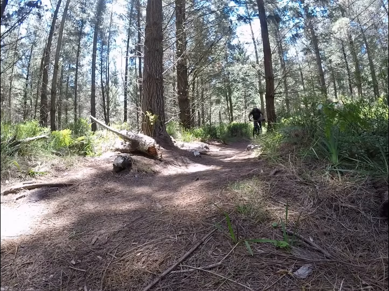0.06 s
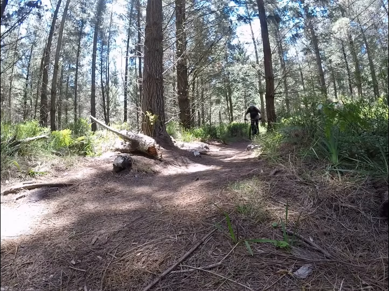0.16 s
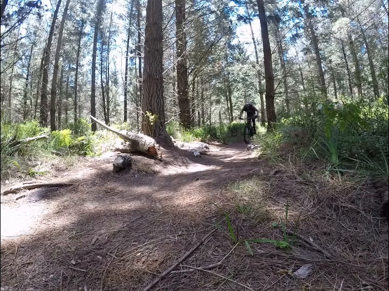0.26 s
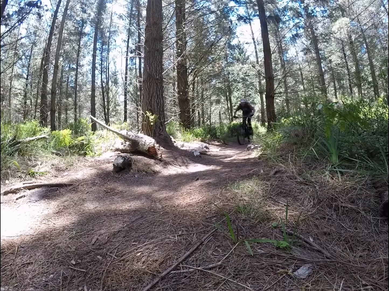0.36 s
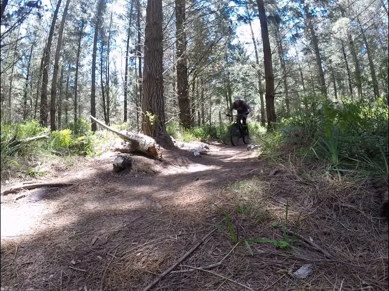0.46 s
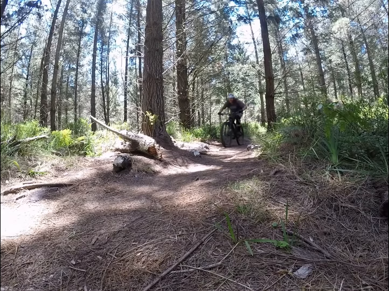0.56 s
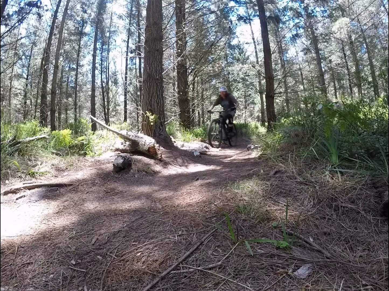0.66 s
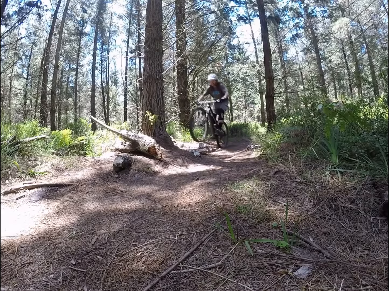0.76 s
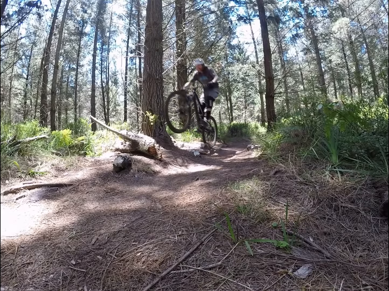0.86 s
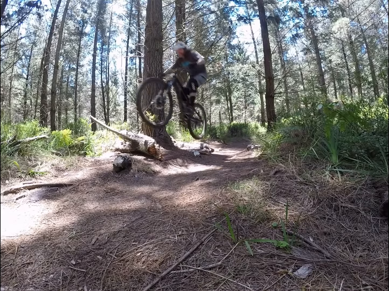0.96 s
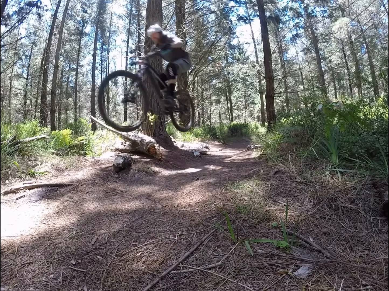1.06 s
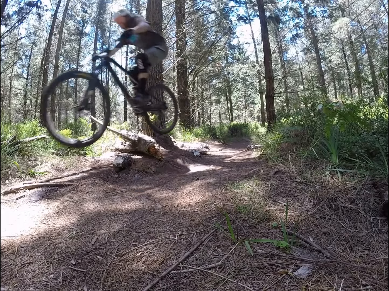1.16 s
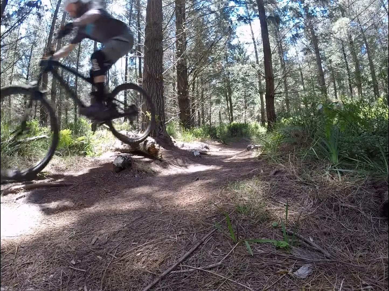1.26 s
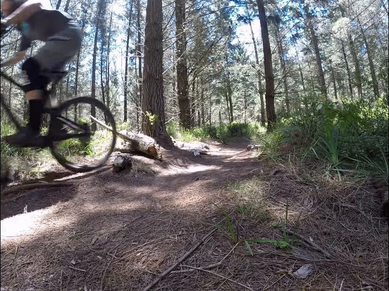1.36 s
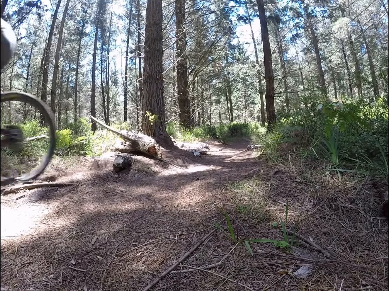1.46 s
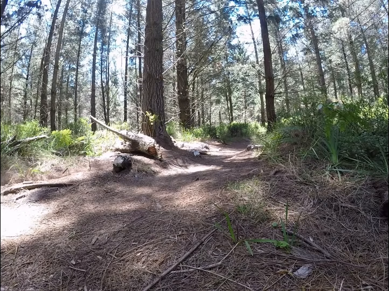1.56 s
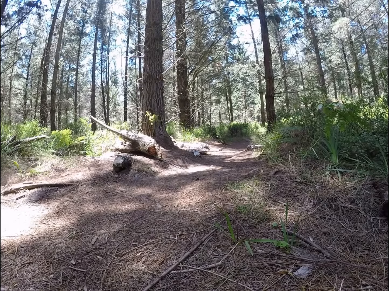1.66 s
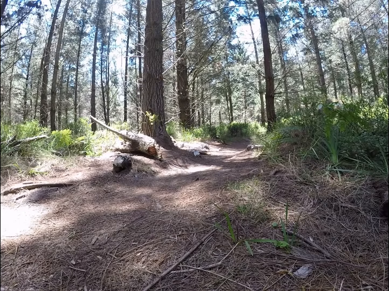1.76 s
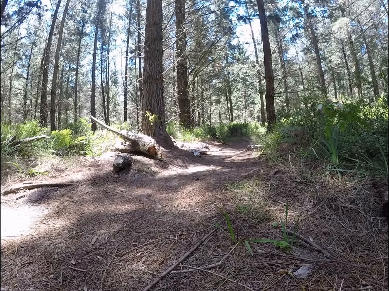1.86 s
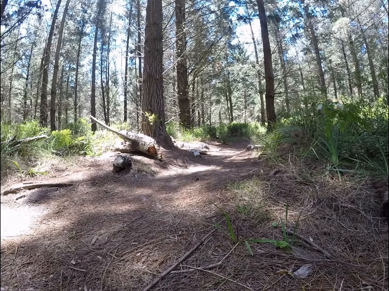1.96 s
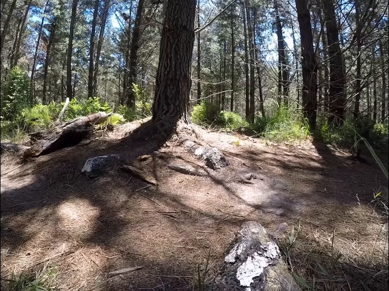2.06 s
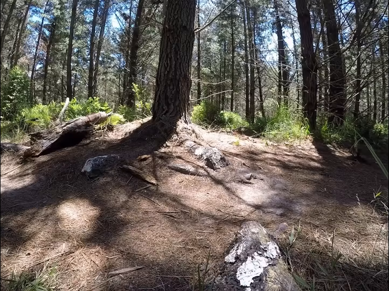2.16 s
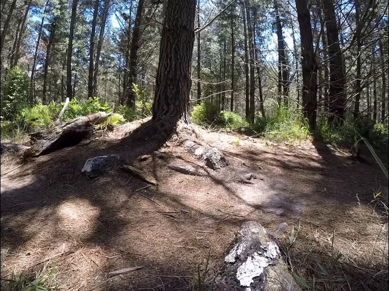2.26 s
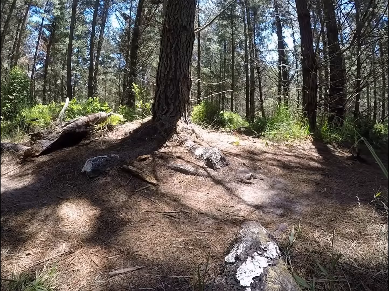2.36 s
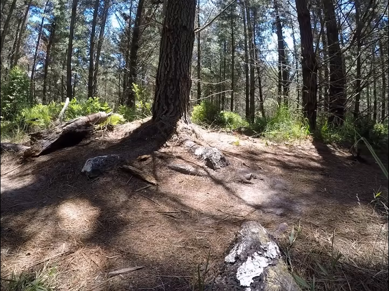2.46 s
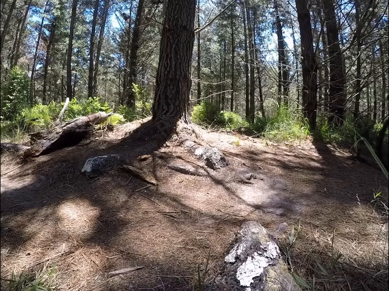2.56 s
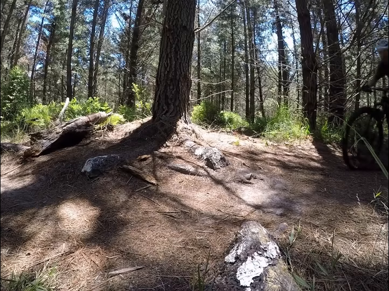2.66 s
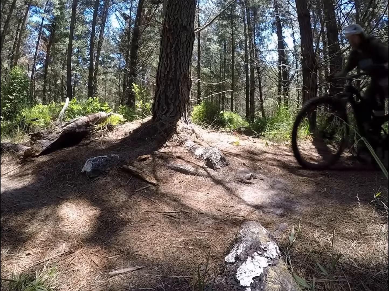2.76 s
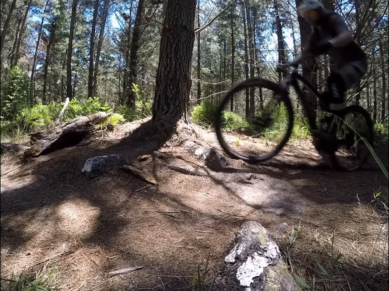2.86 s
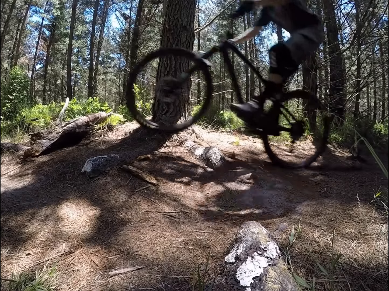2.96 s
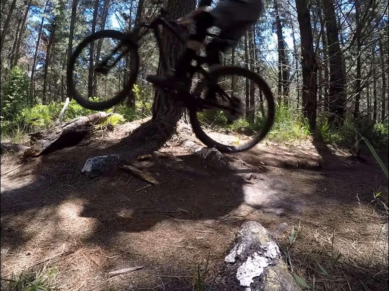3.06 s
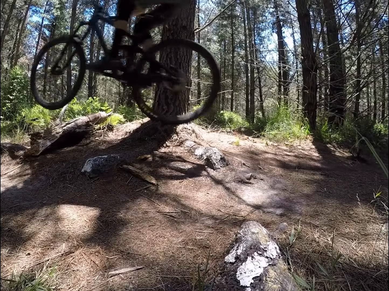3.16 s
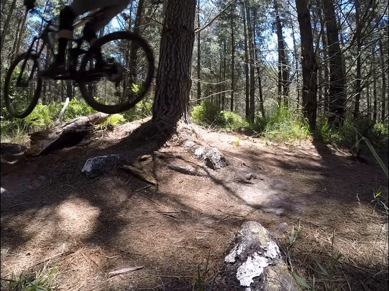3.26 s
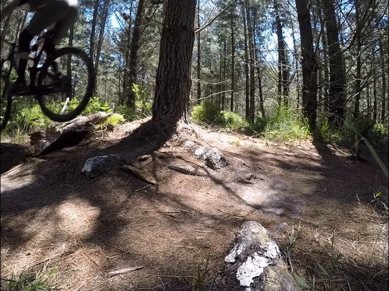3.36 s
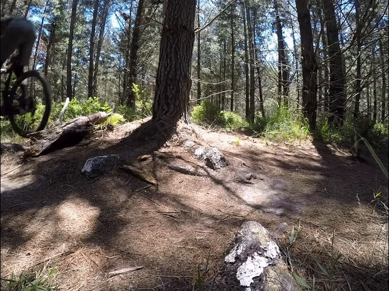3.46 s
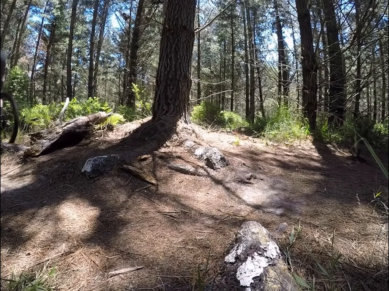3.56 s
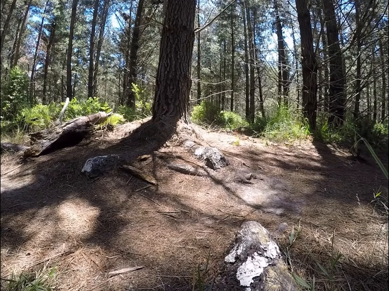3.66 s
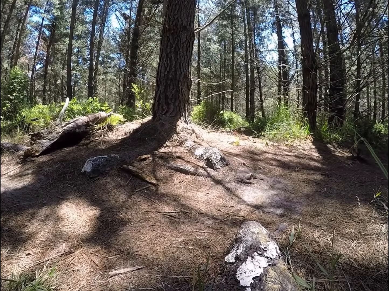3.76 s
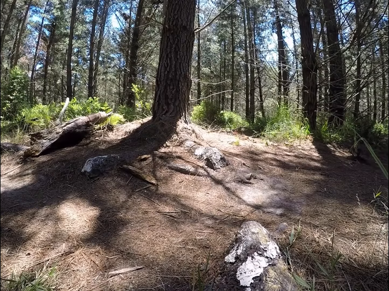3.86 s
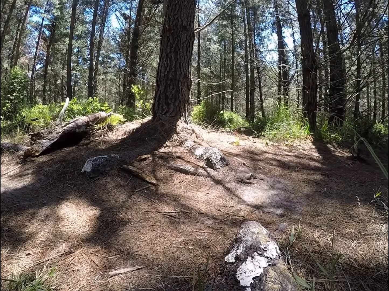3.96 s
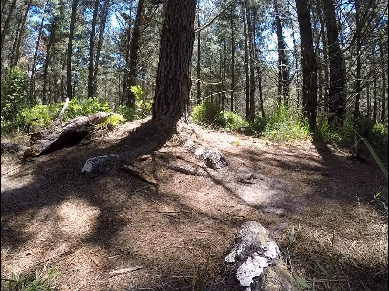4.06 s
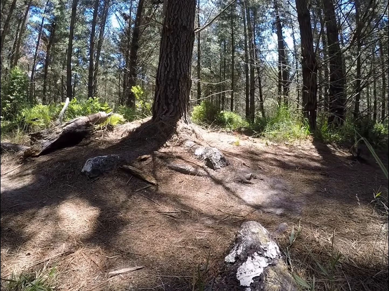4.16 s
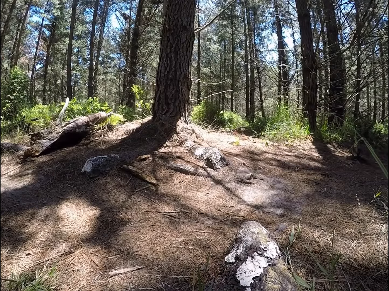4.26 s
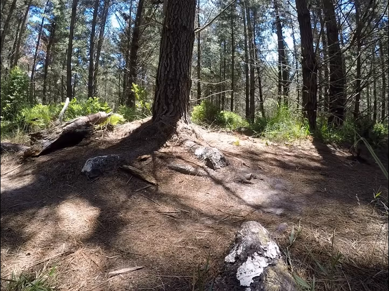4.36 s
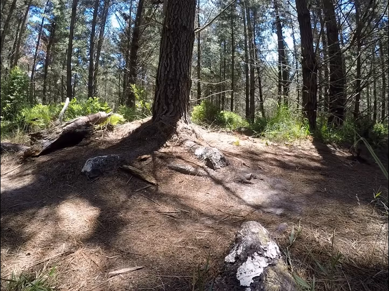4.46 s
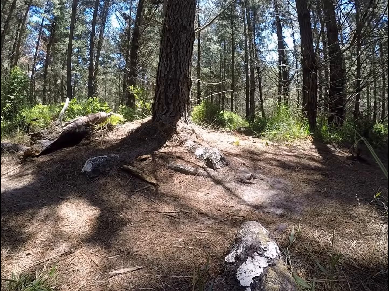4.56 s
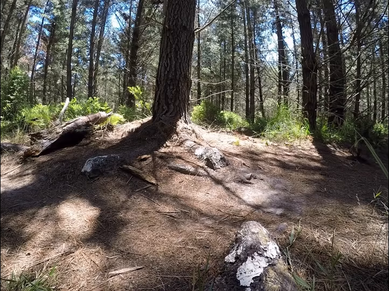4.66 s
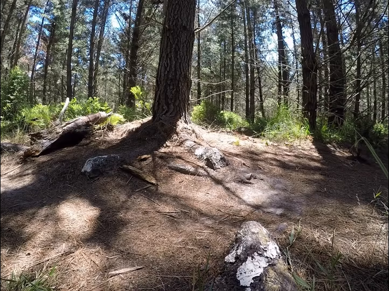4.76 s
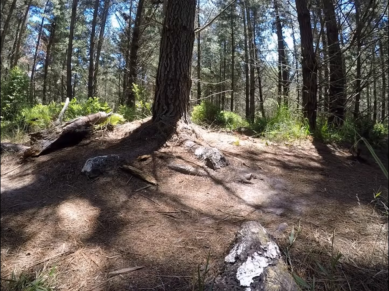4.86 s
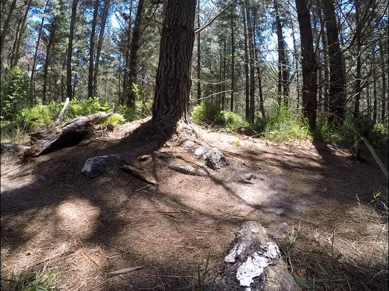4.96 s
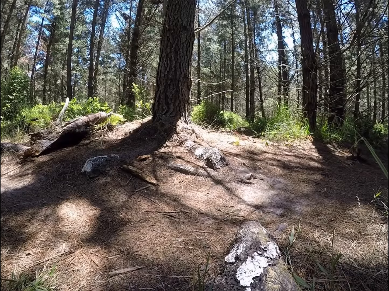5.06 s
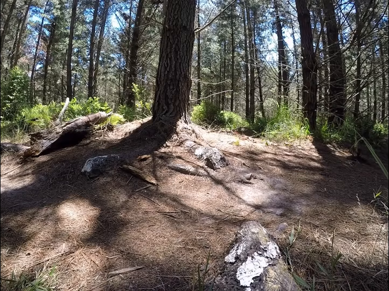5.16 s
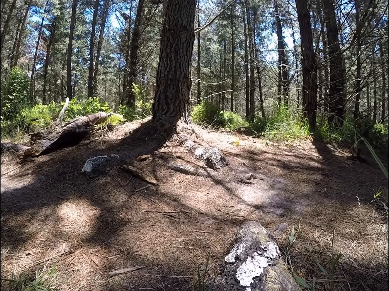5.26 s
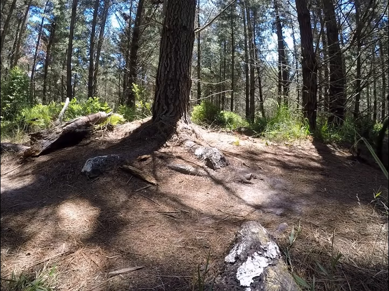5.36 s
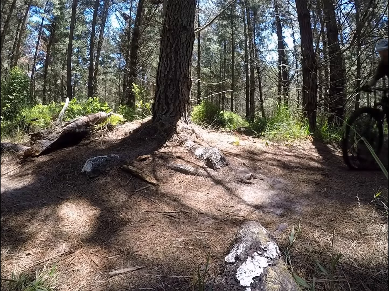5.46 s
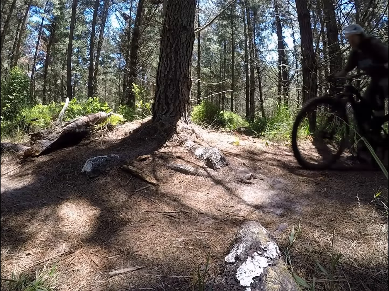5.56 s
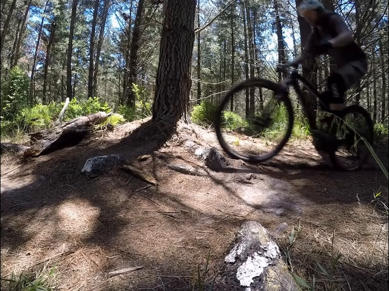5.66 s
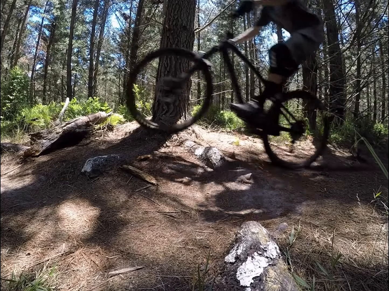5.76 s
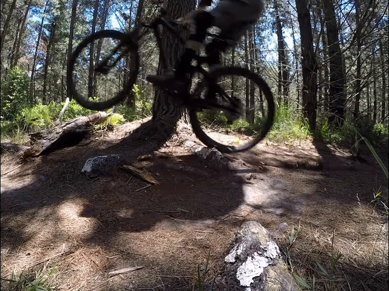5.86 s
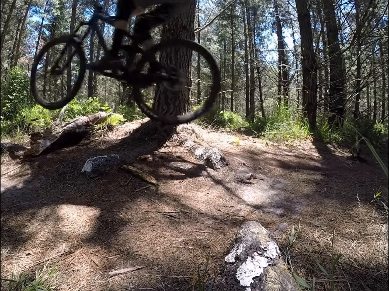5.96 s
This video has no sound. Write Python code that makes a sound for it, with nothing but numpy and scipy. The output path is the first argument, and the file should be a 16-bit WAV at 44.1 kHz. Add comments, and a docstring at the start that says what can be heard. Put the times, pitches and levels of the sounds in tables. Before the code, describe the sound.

A mountain bike buzzes up a dirt forest trail, thumps over a log with chain clatter, and rolls away; a second pass follows and partly repeats.

```python
"""On a forest trail a mountain bike jumps a log, twice, close to a listener near the ground; then part of the second pass repeats.
Shaped noise makes the air in the pines, the deep wake and the crunch; gliding tones make a faint bird.
The tyres drum, and each wheel strike is a set of fading tones with a burst of scuffed soil.
Chain clatter is a shower of tiny clicks ringing the frame; the freehub buzzes as a train of ticks ringing its shell."""
import sys
import numpy as np
from scipy import signal
from scipy.fft import rfft, irfft
from scipy.io import wavfile
from scipy.ndimage import map_coordinates

SR = 44100
rng = np.random.default_rng(int(sys.argv[2]) if len(sys.argv) > 2 else 0)


def bounce(signal):
    """Save signal as a 16-bit WAV file at the path given by the first command-line argument."""
    frames = np.transpose(np.atleast_2d(signal))
    limited = np.clip(frames, -1, 1)
    pcm = np.round(limited * 32767).astype(np.int16)
    wavfile.write(sys.argv[1], SR, pcm)


N = 265261
T = np.arange(N) / SR  # time of every sample, in seconds
FREQS = np.maximum(np.arange(N // 2 + 1) * SR / N, 1)  # in Hz, kept above zero for the logarithm
SECOND_PASS_S, REPEAT_AT_S = 2.1072, 4.91  # the second pass begins; it is heard again

# Tone of tyres drumming on the first trail. Each row: frequency in Hz, relative level in dB per Hz.
FIRST_TRAIL = [(90, -41), (120, -17.5), (150, 1.5), (230, 1.5), (310, -7), (420, -8.5), (600, -13.5),
               (850, -22), (1300, -43.5), (2500, -33.5)]
# A wheel strikes ground or root. Each row: time in seconds, relative thump level in dB, pitch factor,
# length factor, relative scuff level in dB.
WHEEL_STRIKES = [(0.647, -39.5, 1.23, 3.1, -52), (0.717, -24.5, 0.91, 1.7, -60),
                 (0.749, -33.5, 0.79, 0.79, -40), (0.875, -37.5, 1.05, 3.6, -52),
                 (1.2704, -22.5, 1.17, 0.75, -41), (1.339, -18, 0.92, 1.5, -33.5),
                 (1.383, -18, 1.22, 0.46, -37), (1.421, -25.5, 0.98, 0.63, -47),
                 (1.561, -21.5, 1.04, 1, -59), (2.764, -39.5, 1.05, 1.8, -40.5),
                 (2.854, -30, 1.1, 0.4, -42), (2.868, -17, 0.99, 0.61, -38.5),
                 (2.915, -25.5, 1.06, 1.14, -38.5), (3.039, -22, 0.96, 1.2, -50.5),
                 (3.073, -36, 0.97, 1.02, -37), (3.457, -21.5, 0.84, 0.68, -40),
                 (3.501, -20.5, 1.07, 1.1, -41.5), (3.597, -24.5, 0.99, 1.2, -69)]


def from_db(db):
    """Turn decibels into a gain."""
    return 10 ** (np.asarray(db) / 20)


def rms_one(x):
    """Scale a sound so that its average strength (rms) is 1."""
    return x / np.sqrt(np.mean(x ** 2) + 1e-20)


def in_time(rows):
    """Draw each column of a time table as a curve over every sample."""
    s, *columns = np.transpose(rows)
    return [np.interp(T, s, column) for column in columns]


def over_hz(points):
    """Draw a frequency table as a curve over every frequency."""
    hz, value = np.transpose(points)
    return np.interp(np.log(FREQS), np.log(hz), value)


def colour(x, spectrum):
    """Filter x by a tone curve that dies away above its last point; rms 1."""
    skirt = 1 / (1 + (FREQS / spectrum[-1][0] / 2) ** 4)
    return rms_one(irfft(rfft(x) * from_db(over_hz(spectrum)) * skirt, N))


def drift(rate_hz):
    """Wander at random, mostly slower than rate_hz; rms 1."""
    return rms_one(irfft(rfft(rng.standard_normal(N)) / (1 + (FREQS / rate_hz) ** 2), N))


def resonate(x, modes):
    """Ring several resonances side by side, with alternating sign."""
    out = 0
    for k, (hz, width_hz, db) in enumerate(modes):
        radius = np.exp(-np.pi * width_hz / SR)
        poles = [1, -2 * radius * np.cos(2 * np.pi * hz / SR), radius ** 2]
        gain = (-1) ** k * from_db(db) * (1 - radius ** 2) / 2
        out = out + gain * signal.lfilter([1, 0, -1], poles, x + 1e-18)
    return out


def grains(per_s, spread_db):
    """Scatter tiny clicks of uneven size at random times."""
    sizes = from_db(spread_db * np.minimum(rng.exponential(1, N), 4))
    return (rng.random(N) < per_s / SR) * sizes * rng.choice([-1, 1], N)


def dying(s, t60):
    """Give the samples after a blow at time s, their age, and a level that falls 60 dB in t60 seconds."""
    span = slice(int(s * SR), int(s * SR) + SR // 3)
    age = T[span] - T[span][0]
    return span, age, 1000. ** (-age / t60)


def lagged(x, lag_s):
    """Follow x sluggishly, as something with inertia does."""
    keep = np.exp(-1 / (lag_s * SR))
    return signal.lfilter([1 - keep], [1, -keep], x)


def low_cut(x, edge_hz):
    """Remove deep bass with a steep high-pass, leaving the thumps lean."""
    return signal.sosfilt(signal.butter(4, edge_hz, "high", fs=SR, output="sos"), x + 1e-18)


def per_jump(rows):
    """Spread a table with one row per jump over every sample, column by column."""
    return np.array(rows)[(T >= SECOND_PASS_S).astype(int)].T


def ride():
    """Pass in a straight line: level by distance (dB), facing (near 1 coming, -1 going), eased stretch (0 or 1)."""
    # The two jumps. Each row: time of nearest approach in seconds, distance then in metres, speed coming and
    # speed going in metres per second, start and end of the stretch where the crunch softens
    # and the ticking slows, in seconds.
    jumps = [(1.38, 2.04, 7.4, 4.8, 0.9, 1.5), (3.1, 2.43, 8.6, 4.3, 3.0, 3.1)]
    undergrowth_db_per_m = 1.97
    nearest_s, nearest_m, approach, departure, ease_start, ease_end = per_jump(jumps)
    ahead_m = np.where(T < nearest_s, approach, departure) * (nearest_s - T)
    metres = np.hypot(ahead_m, nearest_m)
    near_db = -20 * np.log10(metres) - undergrowth_db_per_m * metres
    eased = 1. * ((T > ease_start) & (T < ease_end))
    return near_db, ahead_m / metres, eased


def trunks(x, t60, dull_hz):
    """Scatter sparse, dull echoes back from the tree trunks."""
    span, age, fall = dying(0, t60)
    echoes = grains(per_s=1500, spread_db=5)[span] * fall * (age > .008)
    wet = signal.fftconvolve(x, echoes / np.sqrt(np.sum(echoes ** 2)))[:N]
    return signal.sosfilt(signal.butter(1, dull_hz, fs=SR, output="sos"), wet)


def pine_air(level_db):
    """Air moving in the pines: steady noise with a shaped tone."""
    # Tone of the air. Each row: frequency in Hz, relative level in dB per Hz.
    air_tone = [(60, -77), (150, -3), (350, 5), (700, -1.5), (1200, -13.5), (2700, -20), (3700, -14.5),
                (5000, -27), (7300, -26), (8600, -16.5), (11500, -24.5), (15000, -37)]
    return from_db(level_db) * colour(rng.standard_normal(N), air_tone)


def bird(warble_hz, blur):
    """A small distant bird: fast-warbled notes that slide downwards."""
    # Its phrases. Each row: start in seconds, length in seconds, first and last frequency in Hz,
    # relative level in dB.
    phrases = [(3.824, 0.11, 4440, 3560, -62.5), (4.256, 0.019, 5200, 4720, -63),
               (4.373, 0.096, 4400, 3880, -67), (4.536, 0.13, 5700, 4440, -65),
               (4.748, 0.11, 4400, 3650, -63)]
    out, warble, flutter = np.zeros(N), warble_hz * drift(400), 1 + blur * drift(120)
    for s, length, first_hz, last_hz, db in phrases:
        along = np.clip((T - s) / length, 0, 1)
        hz = first_hz + (last_hz - first_hz) * along + warble
        swell = np.sqrt(np.abs(np.sin(np.pi * along)))
        out += from_db(db) * swell * flutter * np.sin(2 * np.pi * np.cumsum(hz) / SR)
    return out


def ground(calm_db, gust_db):
    """A deep rumble as the bike's wake swells, gusts and fades, with short booms under hard landings."""
    # Tone of the rumble. Each row: frequency in Hz, relative level in dB per Hz.
    deep_tone = [(15, -25), (28, 1), (42, 1), (60, 1), (90, -1.5), (125, -4), (180, -25)]
    # The wake buffets the listening point, one row per jump. Each row: start in seconds, level in dB,
    # rise in seconds, fading in dB per second.
    wakes = [(1.25, -44.5, 0.024, 1.5), (2.83, -42.5, 0.28, 2.5)]
    # Hard landings shake the ground. Each row: time in seconds, level in dB, frequency in Hz,
    # time to fall 60 dB in seconds.
    booms = [(1.34, -27, 55, 0.074), (1.362, -20.5, 42, 0.074), (3.461, -21.5, 47.3, 0.14),
             (3.505, -17, 37.8, 0.28)]
    start, wake_db, rise_s, fading = per_jump(wakes)
    since = np.maximum(T - start, 0)
    gusts = gust_db * drift(16)
    wake = from_db(wake_db - fading * since + gusts) * (1 - np.exp(-since / rise_s))
    out = colour(rng.standard_normal(N), deep_tone) * (wake + from_db(calm_db))
    for s, db, hz, t60 in booms:
        span, age, fall = dying(s, t60)
        out[span] += from_db(db) * fall * np.sin(2 * np.pi * hz * age)
    return out


def freehub(ring_db, sizzle_db, ring_forward_db, sizzle_forward_db, sizzle_falloff, ring_slowed_db,
            sizzle_slowed_db):
    """Pawls drop over ratchet teeth and ring the hub, softer and duller as the ticking slows; the sizzle beams forward."""
    # Hub shell resonances, then those of the top sizzle. Each row: frequency in Hz, width in Hz,
    # relative level in dB for one pass.
    shell_modes = [(2450, 350, -4), (3850, 610, -3), (5520, 710, -1), (6670, 1030, -2.5), (8205, 440, 2),
                   (8570, 410, 2.5), (9440, 590, 1), (10880, 1100, -4.5)]
    sizzle_modes = [(12830, 2200, 3), (13840, 1000, 2), (14900, 1100, -5)]
    # the ticking slows in the eased stretch and picks up again after it; slowing and wobble are shares of the rate
    pawls_per_s, slowing, spin_lag_s, wobble = 106, 0.31, 0.15, 0.035
    near_db, facing, eased = ride()
    slowed = lagged(eased, spin_lag_s)
    rate = pawls_per_s * (1 - slowing * slowed + wobble * drift(2.3))
    teeth = np.cumsum(rate) / SR
    since_tooth_s = (teeth % 1) / rate
    ticks = (np.exp(-since_tooth_s / .004) + .45) * rng.standard_normal(N)
    # resonating twice leaves deep valleys between the peaks
    shell = rms_one(resonate(resonate(ticks, shell_modes), shell_modes))
    sizzle = rms_one(resonate(resonate(ticks, sizzle_modes), sizzle_modes))
    shell_level = ring_db + near_db + ring_forward_db * facing + ring_slowed_db * slowed
    sizzle_level = (sizzle_db + sizzle_falloff * near_db + sizzle_forward_db * facing
                    + sizzle_slowed_db * slowed)
    return shell * from_db(shell_level) + sizzle * from_db(sizzle_level)


def ground_bounce(x, share, lag_s, sway):
    """Add an echo off the soil; its lag wanders slightly at random, so the colour drifts."""
    lag = lag_s * np.exp(sway * drift(1))
    echo = map_coordinates(x, [np.maximum(T - lag, 0) * SR], order=3)
    return (x + share * echo) / np.sqrt(1 + share ** 2)


def rolling(drum_db, crunch_db, lumpy_db, patchy_db, snap_db, near_share, forward_db, eased_db, load_share):
    """Tyre knobs drum on packed soil; needles crackle and twigs snap, louder coming and near, softer when eased."""
    # How hard the tyres drum, one curve per jump. Each row: time in seconds, relative level in dB.
    tread = [
        [(0.05, -46.5), (0.37, -49.5), (0.6, -49.5), (0.82, -44.5), (0.98, -49), (1.27, -44.5), (1.45, -36.5),
         (1.82, -46), (2.08, -48.5)],
        [(2.13, -48), (2.76, -46), (2.99, -41), (3.23, -47.5), (3.44, -48.5), (3.64, -44), (4.24, -47),
         (4.58, -51), (4.87, -53)],
    ]
    # Tone of the drumming on the second trail, then of the needles.
    # Each row: frequency in Hz, relative level in dB per Hz.
    second_trail = [(90, -29), (120, -21), (150, 4), (230, 2), (310, -4), (420, -9), (600, -12), (850, -23),
                    (1300, -34), (2500, -34)]
    needle_tone = [(500, -7.5), (900, 6), (1400, 7), (2200, 0), (3200, -12.5), (5000, -24), (7500, -2),
                   (15000, -15)]
    # Dry twigs and grit snapping under the tread. Each row: frequency in Hz, width in Hz, relative level in dB.
    twig_modes = [(870, 230, 1.5), (1420, 580, -3), (1820, 1400, -7.5), (2570, 170, -2.5)]
    drum, = in_time(np.vstack(tread))
    near_db, facing, eased = ride()
    load = load_share * (drum - drum.mean())
    softening = eased_db * lagged(eased, lag_s=0.041)
    crunch = drum + load + near_share * near_db + forward_db * facing + softening
    contacts = grains(per_s=2500, spread_db=0.5)
    soil = np.where(T < SECOND_PASS_S, colour(contacts, FIRST_TRAIL), colour(contacts, second_trail))
    knobs = soil * from_db(drum + drum_db + lumpy_db * drift(18))
    needles = colour(grains(per_s=2200, spread_db=1.0), needle_tone) * from_db(patchy_db * drift(20))
    snap_fall = dying(0, .025)[2]
    snaps = signal.fftconvolve(np.abs(grains(per_s=70, spread_db=2.5)), snap_fall)[:N]
    twigs = rms_one(resonate(snaps * rng.standard_normal(N), twig_modes))
    litter = needles * from_db(crunch_db) + twigs * from_db(snap_db)
    return knobs + litter * from_db(crunch)


def scuffs(level_db, rise_s):
    """At each strike the tread shears the soil in a short burst of coarse grains."""
    # Tone of skidding grit. Each row: frequency in Hz, relative level in dB per Hz.
    grit_tone = [(300, -4), (550, 4.5), (950, 2), (1400, -2.5), (1750, -4), (2150, -6.5), (2700, -13),
                 (3300, -18.5), (7000, -21)]
    scuff_t60_s = 0.19  # times the strike's length factor
    firm_db = -20.5
    out, grit = np.zeros(N), colour(grains(per_s=3200, spread_db=4.5), grit_tone)
    for s, thump_db, _, length, db in WHEEL_STRIKES:
        span, age, fall = dying(s, scuff_t60_s * length)
        bite_s = rise_s * from_db(firm_db - thump_db)
        bite = 1 - np.exp(-(age / bite_s) ** 2)
        out[span] += from_db(db + level_db) * fall * bite * grit[span]
    return out


def clatter(level_db, rise_s, breadth, rattle_db, rattle_t60, crack_db, clump_db):
    """At each jolt and slap, chain links crack against the frame in a quick shower and rattle on softly."""
    # Frame resonances. Each row: frequency in Hz, width in Hz, relative level in dB.
    frame_modes = [(920, 190, 5), (1805, 400, 6.5), (2085, 380, 7.5), (2500, 470, 3), (3900, 1560, -2),
                   (4950, 640, 3), (5700, 1100, -1), (8350, 2800, -5), (12800, 1600, -26)]
    # The chain slaps the frame. Each row: time in seconds, relative level in dB, centre frequency in Hz,
    # time to fall 60 dB in seconds.
    slaps = [(0.765, -44, 4600, 0.18), (1.2183, -34.5, 3200, 0.034), (1.2276, -35.5, 4730, 0.044),
             (1.3049, -13, 3580, 0.01), (1.3669, -29.5, 4550, 0.12), (1.402, -35, 5500, 0.06),
             (1.416, -15, 4060, 0.031), (1.47, -29.5, 4120, 0.025), (1.5266, -38, 3660, 0.082),
             (1.5703, -40.5, 3030, 0.19), (1.8085, -33, 2180, 0.029), (2.869, -28.5, 2160, 0.018),
             (2.9076, -25.5, 2510, 0.034), (2.9275, -18.5, 4000, 0.036), (3.0746, -31, 2100, 0.036),
             (3.465, -31, 5900, 0.047), (3.524, -31, 4630, 0.12), (3.572, -36.5, 3800, 0.14)]
    # every wheel strike also shakes the chain; the level is relative to its thump
    jolt_db, jolt_hz, jolt_t60_s = -21.5, 3300, 0.053
    contacts = rms_one(grains(per_s=9000, spread_db=1))
    out, links = np.zeros(N), rms_one(resonate(contacts, frame_modes))
    clumps = rms_one(from_db(clump_db * drift(89)))  # the loose rattle comes in uneven bunches
    jolts = [(s, db + jolt_db, jolt_hz, jolt_t60_s) for s, db, *_ in WHEEL_STRIKES]
    for s, db, hz, t60 in list(slaps) + jolts:
        span, age, fall = dying(s, t60)
        rattle = from_db(rattle_db) * dying(s, rattle_t60)[2] * clumps[span]
        band = signal.butter(2, [hz / breadth, hz * breadth], "band", fs=SR, output="sos")
        shower = rms_one(signal.sosfilt(band, links[span]))
        crack = from_db(crack_db) * contacts[span] * fall ** 2
        rise = 1 - np.exp(-age / rise_s)
        out[span] += from_db(db + level_db) * (shower * (fall + rattle) + crack) * rise
    return out


def thumps(level_db, scrub_db, scrub_t60, rise_s):
    """Each blow rings the tyre, again as it bottoms out, and the tread scrubs the soil as it squashes."""
    # Tyre and soil resonances. Each row: frequency in Hz, relative level in dB,
    # time to fall 60 dB in seconds; strikes scale the frequency and the time.
    tyre_modes = [(182.6, -5.5, 0.073), (226.6, 4.5, 0.038), (282, -1, 0.037), (382.6, -7.5, 0.11),
                  (557, -13, 0.012), (756, -16, 0.016), (980, -22, 0.029)]
    # a second, weaker bump follows as the tyre squashes fully
    bottom_out_s, bottom_out_db = 0.019, -4.5
    out, scrub = np.zeros(N), colour(rng.standard_normal(N), FIRST_TRAIL)
    bumps = []
    for s, db, pitch, length, _ in WHEEL_STRIKES:
        bumps.append((s, db, pitch, length))
        bumps.append((s + bottom_out_s, db + bottom_out_db, pitch, length))
    # each bump excites the resonances a little differently, by a few dB
    strengths = rng.normal(0, 2.5, (len(bumps), len(tyre_modes)))
    for (s, db, pitch, length), touch in zip(bumps, strengths):
        for (hz, mode_db, t60), touch_db in zip(tyre_modes, touch):
            span, age, fall = dying(s, t60 * length)
            envelope = fall * (1 - np.exp(-age / rise_s))
            tone = np.sin(2 * np.pi * hz * pitch * age)
            out[span] -= from_db(db + mode_db + touch_db + level_db) * envelope * tone
        span, age, fall = dying(s, scrub_t60)
        out[span] += from_db(db + scrub_db) * fall * (1 - np.exp(-age / rise_s)) * scrub[span]
    return out


def two_ears(x, side_db, lean_db):
    """Keep the sound mono except for the top treble, which spreads and leans right."""
    spread_hz = 11000
    above = 1 / (1 + (spread_hz / FREQS) ** 40)
    top = irfft(rfft(x) * above, N)
    loose = irfft(rfft(top * drift(400)) * above, N)  # same band and similar loudness, unrelated phase
    lean = from_db(np.array([[lean_db], [-lean_db]]) / 2)
    return x - top + lean * (top + from_db(side_db) * loose * [[1], [-1]])


def scene():
    """Mix the bike into the forest; at the end part of the second pass repeats."""
    song = bird(warble_hz=200, blur=0.5)
    song_echo = trunks(song, t60=0.71, dull_hz=7000)
    forest = pine_air(level_db=-58) + from_db(-2.5) * song + from_db(-3) * song_echo

    hub = freehub(ring_db=-43.5, sizzle_db=-42.0, ring_forward_db=1.5, sizzle_forward_db=6.0,
                  sizzle_falloff=1.4, ring_slowed_db=-3.0, sizzle_slowed_db=-9)
    tyres = rolling(drum_db=0.5, crunch_db=-10.5, lumpy_db=1.0, patchy_db=3.0, snap_db=-13.5,
                    near_share=0.5, forward_db=5.5, eased_db=-7, load_share=0.16)
    chain = clatter(level_db=-8, rise_s=0.0017, breadth=1.8, rattle_db=-20, rattle_t60=0.2,
                    crack_db=-10.0, clump_db=4.0)
    wheels = low_cut(thumps(level_db=-7.5, scrub_db=-9.5, scrub_t60=0.095, rise_s=0.00077), edge_hz=140)
    blows = wheels + chain + scuffs(level_db=-1.8, rise_s=0.0015)
    blow_echo = from_db(-9.0) * trunks(blows, t60=0.37, dull_hz=4060)
    bike = blows + blow_echo + tyres + ground(calm_db=-78.5, gust_db=2.2)
    bike = bike + ground_bounce(hub, share=0.42, lag_s=0.00099, sway=0.025)

    out = two_ears(bike + forest, side_db=-5.0, lean_db=-1.5)
    at, start = round(REPEAT_AT_S * SR), round(SECOND_PASS_S * SR)
    return np.hstack([out[:, :at], out[:, start:start + N - at]])


def record(dry):
    """Open after a moment of silence, dip briefly before the repeat, and cut the top steeply."""
    cutoff_hz = 15350
    opening = np.clip((T - .022) / .018, 0, 1)
    dip = 1 - .95 * np.exp(-((T - REPEAT_AT_S + .016) / .006) ** 2)
    top_cut = signal.ellip(10, .2, 80, cutoff_hz, fs=SR, output="sos")
    return signal.sosfilt(top_cut, dry * opening * dip)


dry = scene()
out = record(dry)
bounce(out)
```